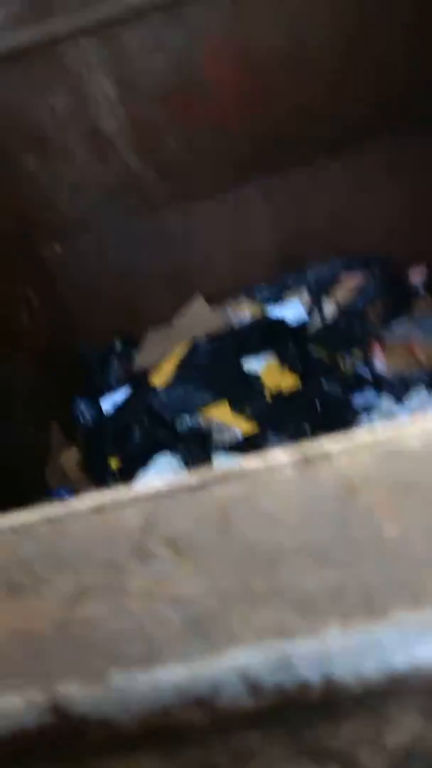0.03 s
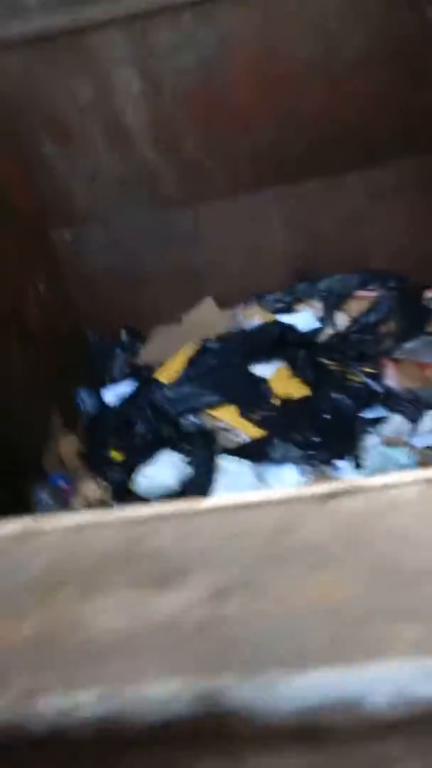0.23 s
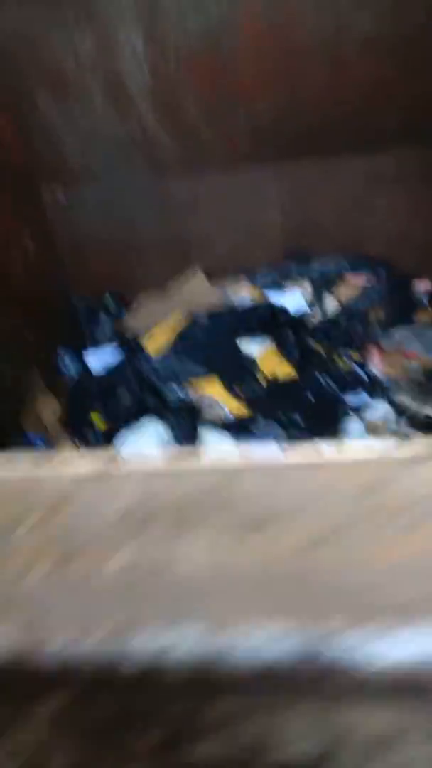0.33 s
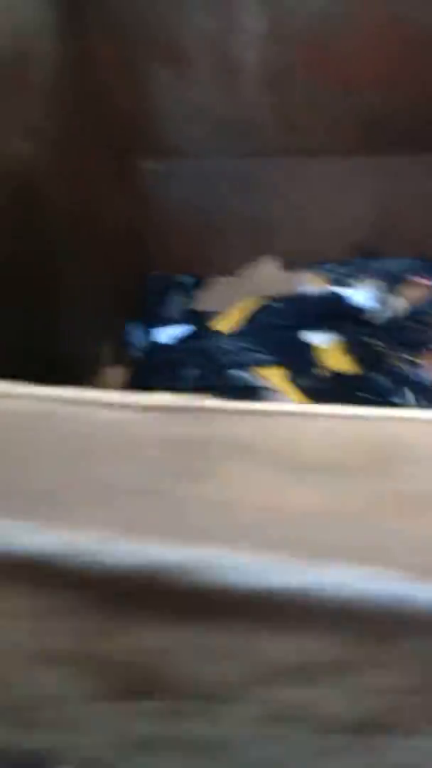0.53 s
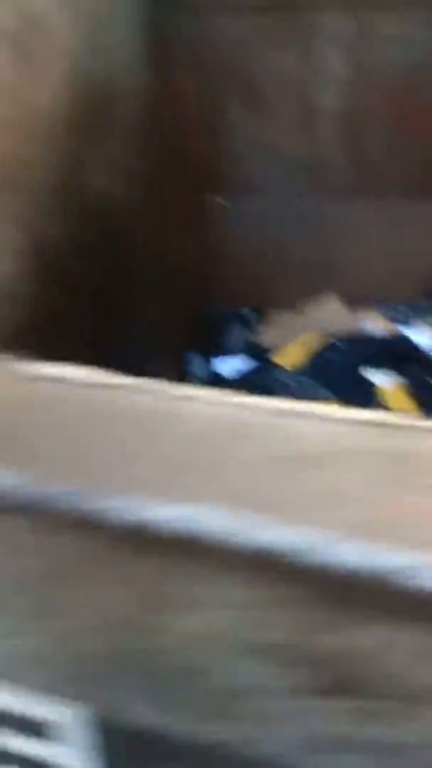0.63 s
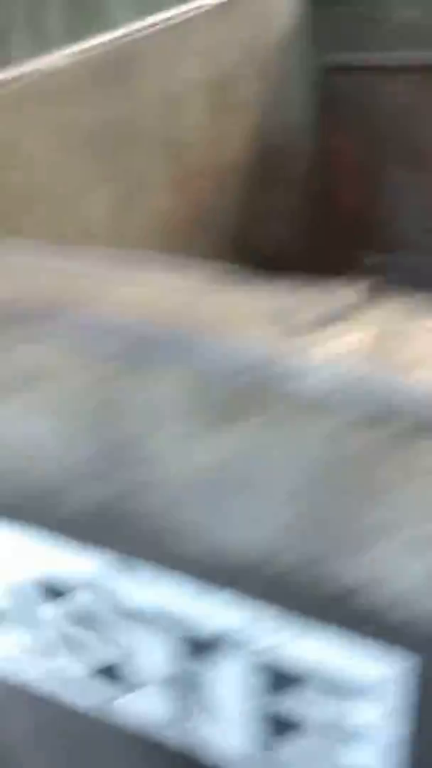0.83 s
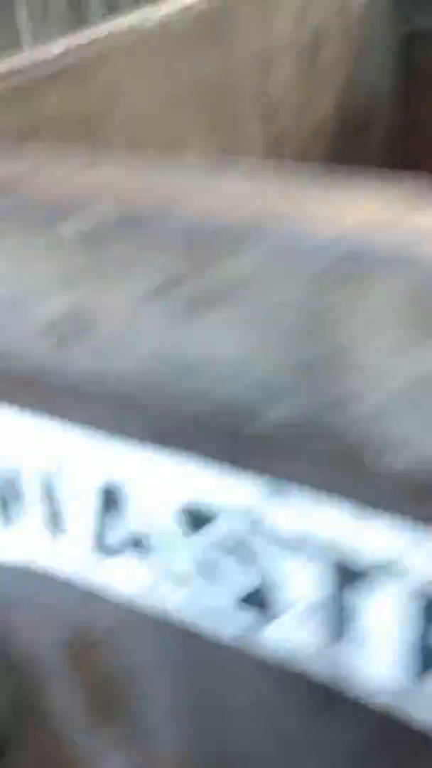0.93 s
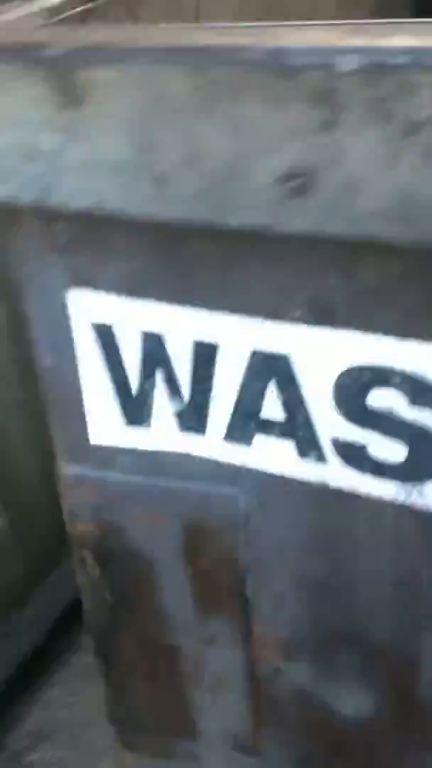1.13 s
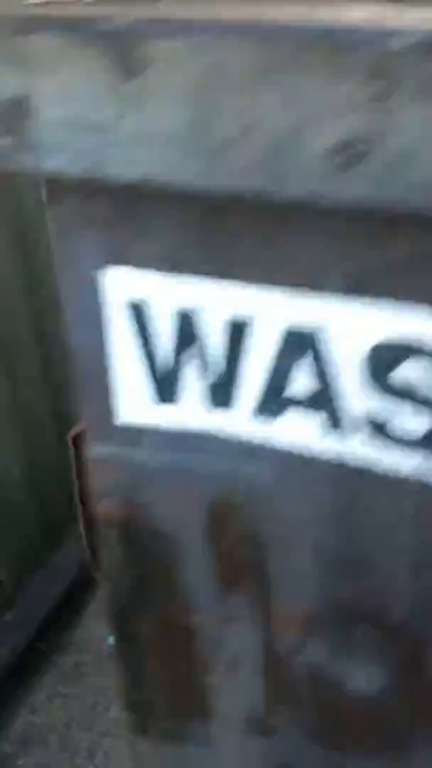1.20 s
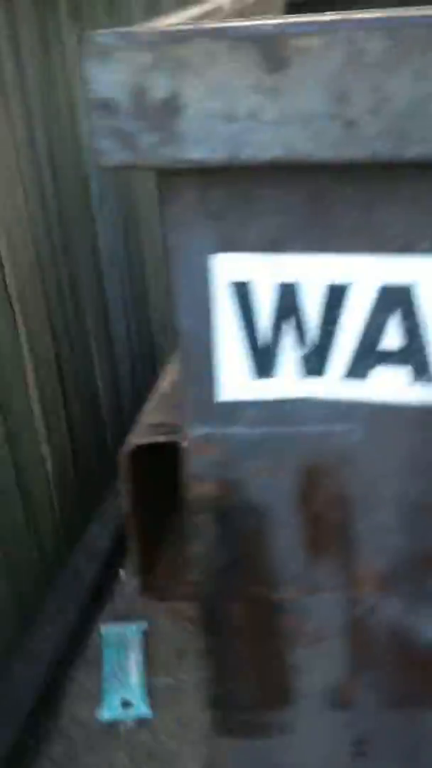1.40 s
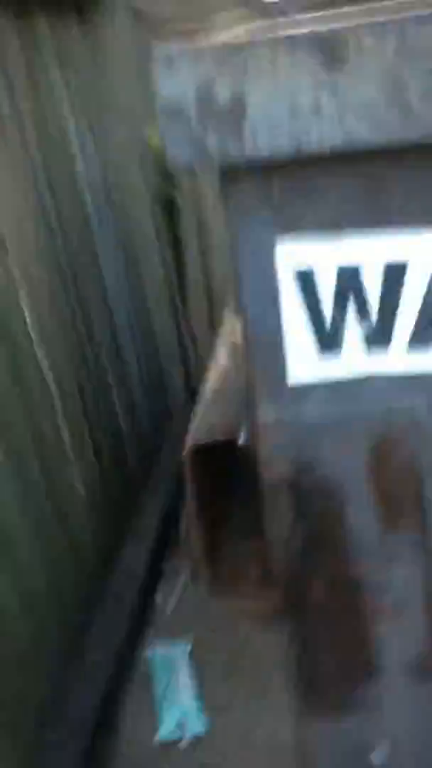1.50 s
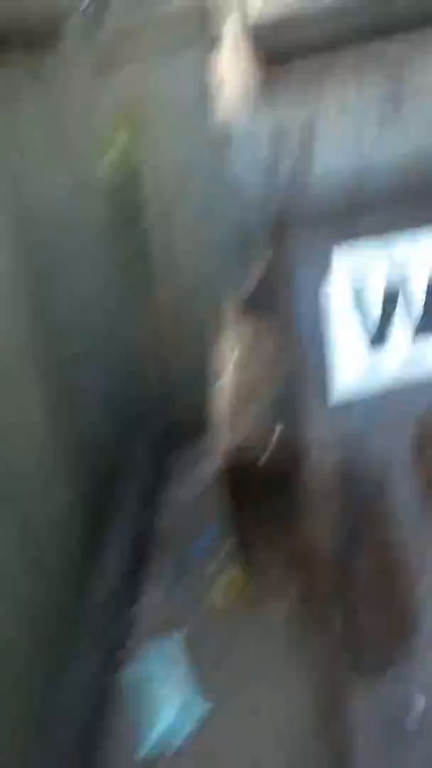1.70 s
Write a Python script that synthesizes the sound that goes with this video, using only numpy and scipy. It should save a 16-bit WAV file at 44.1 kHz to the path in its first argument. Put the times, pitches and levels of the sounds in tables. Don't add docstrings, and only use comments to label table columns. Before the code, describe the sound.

A heavy load thuds into a big steel waste bin, which booms and rings down outdoors

```python
import sys
import numpy as np
from scipy import signal
from scipy.fft import rfft, irfft, next_fast_len
from scipy.io import wavfile
from scipy.ndimage import uniform_filter1d, minimum_filter1d

SR = 44100
rng = np.random.default_rng(int(sys.argv[2]) if len(sys.argv) > 2 else 0)


def master(y):
    cut = np.clip(np.atleast_2d(y).T, -1, 1)
    pcm = np.round(cut * 32767)
    wavfile.write(sys.argv[1], SR, pcm.astype(np.int16))


def invert_db(x):
    u = np.asarray(x, float) / 20
    return 10 ** u


N = 77175
TIME = np.arange(N) / SR


def unit(x):
    return x / np.sqrt(np.mean(x ** 2) + 1e-20)


def along(points, hz):
    f, v = np.transpose(points)
    return np.interp(np.log(hz + 1), np.log(f + 1), v)


def filtered(x, response):
    m = next_fast_len(len(x) + 8192)
    return irfft(rfft(x, m) * response(np.fft.rfftfreq(m, 1 / SR)), m)[:len(x)]


def add(out, s, x):
    i = max(round(s * SR), 0)
    out[i:i + len(x)] += x[:len(out) - i]


def ring(t, hz, db, t60, phase):
    hz, db, t60 = (np.asarray(v)[:, None] for v in (hz, db, t60))
    rise_cycles = 0.37
    size = invert_db(db - 60 * t / t60) * (1 - np.exp(-t * hz / rise_cycles))
    return np.sum(size * np.sin(2 * np.pi * (hz * t + phase)), axis=0)


# start in seconds, strength in dB, brightness in dB per octave
# above 300 Hz, share reaching the low panels in dB per octave below it.
LOAD_BLOWS = [
    (0.2119, -6, -3.5, 1.5),
    (0.2164, -1, -0.5, -8),
    (0.2783, -4, 0, -4.5),
    (.372, -4.5, -6.5, -2),
]
# pitch in Hz, level in dB, decay to -60 dB in seconds.
WALL_PANELS = [(45.6, -25.5, 2.1), (58.92, -12, 1.45), (102.05, -18, 1.8), (122.5, -9, 0.84),
               (138.57, -15, 1.8), (175.3, -12, 1.48), (214.2, -7.5, 0.84), (246, -10, 1.012),
               (312.6, -20, 0.97), (342.6, -14.5, 0.77), (418.3, -13.5, 0.79), (456.6, -13.5, .5),
               (698.5, -23.5, 0.41), (1047, -26.5, 0.14)]
# frequency in Hz, level in dB.
PLATE_LEVEL = [(30, -26), (110, -18), (300, -12.5), (540, -19.5), (700, -20.5), (1200, -29.5),
               (2500, -41.5), (4600, -62)]
# frequency in Hz, decay to -60 dB in seconds.
PLATE_DECAY = [(40, 1.06), (180, 0.8), (450, 0.61), (800, 0.35), (2000, 0.22), (4600, 0.26)]


def steel(count=230):
    out, cracks = np.zeros(N), np.zeros(N)
    step = 4

    hz, db, t60 = np.transpose(WALL_PANELS)
    pair_hz, pair_db = 3.5, -4.5
    twin = hz + pair_hz * rng.choice([-1, 1], len(hz)) * np.sqrt(hz / 100)
    hz, t60, db = np.r_[hz, twin], np.r_[t60, t60], np.r_[db, db + pair_db]

    dense_hz = 30 + 4500 * ((np.arange(count) + rng.random(count)) / count) ** 2
    dense_t60 = along(PLATE_DECAY, dense_hz) * np.exp(0.22 * rng.standard_normal(count))
    for s, strength_db, bright_db, low_db in LOAD_BLOWS:
        def colour(f):
            slope = np.where(f > 300, bright_db, -low_db)
            return strength_db + slope * np.log2(np.maximum(f, 150) / 300)

        t = np.arange(0, N / SR - s + .01, step / SR)
        panel_db = db + colour(hz) + 2.44 * rng.standard_normal(len(hz))
        sound = ring(t, hz, panel_db, t60, flutter(t, 0.08, len(hz)))

        t = t[:SR // 6]
        dense_db = along(PLATE_LEVEL, dense_hz) - 6 + colour(dense_hz) + 1.4 * rng.standard_normal(count)
        field = ring(t, dense_hz, dense_db, dense_t60, flutter(t, 0.3, count))
        add(sound, 0, field * np.clip((t[-1] - t) * 4, 0, 1))

        add(out, s, signal.resample_poly(sound, step, 1))
        add(cracks, s, crack(strength_db, bright_db))
    return filtered(out, lambda f: 1 / (1 + (f / 6000) ** 12)) + cracks


def flutter(t, turns, count):
    knots = turns * rng.standard_normal((count, 60))
    u = t * 28
    k = u.astype(int)
    ease = np.sin(np.pi / 2 * (u - k)) ** 2
    return rng.random((count, 1)) + knots[:, k] + (knots[:, k + 1] - knots[:, k]) * ease


# frequency in Hz, level in dB.
CRACK_COLOUR = [(300, -43.5), (800, 20), (2300, 0), (3800, -25.5), (5200, -31), (8000, -47), (15000, -59)]


def crack(strength_db, bright_db):
    t = TIME[:SR // 10]
    rise_s, t60_s, level_db = 0.0015, 0.023, -1

    def colour(f):
        return invert_db(along(CRACK_COLOUR, f) + bright_db * np.log2((f + 1) / 800))

    burst = filtered(rng.standard_normal(len(t)), colour)
    shape = (1 - np.exp(-(t / rise_s) ** 2)) * invert_db(-60 * t / t60_s)
    return invert_db(strength_db + level_db + 3 * min(bright_db, 0)) * shape * unit(burst)


# start in seconds, rise in seconds, decay to -60 dB in seconds,
# level in dB, centre in Hz.
BAG_RUSTLES = [(.02, 0.027, 0.33, -63.5, 2500), (0.074, 0.029, 0.45, -55, 2700), (.07, 0.1, 0.76, -38, 279),
               (.075, 0.067, .4, -62, 7480), (0.089, 0.055, 0.55, -61, 4550),
               (0.089, .07, 0.56, -64.5, 1080), (.192, 0.029, .05, -36, 2300),
               (.405, 0.019, .16, -39, 2448), (.41, 0.022, 0.36, -53, 5500), (.53, 0.034, 1, -66.5, 3000),
               (.69, 0.019, 0.15, -43, 1545), (.69, 0.024, 0.45, -63.5, 6920), (.72, 0.03, 0.38, -62, 3300),
               (.7, 0.042, 0.23, -44, 602), (.855, .018, 0.18, -60, 2400), (0.879, .03, 0.37, -71.5, 4500),
               (1.01, 0.033, 0.6, -69, 2900), (1.095, 0.026, 0.13, -64.5, 3500),
               (1.338, 0.0037, 0.24, -62, 3216), (0.208, .01, 0.19, -53.5, 5600),
               (0.27, 0.016, 0.58, -59.5, 5080), (.1, 0.053, 0.23, -45.5, 587)]


def rustles():
    return crinkles(BAG_RUSTLES)


# start in seconds, rise in seconds, decay to -60 dB in seconds,
# level in dB, centre in Hz.
SHOE_SCUFFS = [
    (1.55, 0.0076, .1, -59, 1686),
    (1.58, 0.035, 0.22, -49.5, 1943),
    (1.591, 0.027, 0.17, -53, 4344),
    (1.601, 0.041, 0.27, -65.5, 8130),
    (1.635, 0.014, 0.082, -46.5, 1680),
    (1.649, 0.0028, 0.045, -45, 3800),
    (1.7, 0.024, 0.27, -68, 2770),
]


def scuffs():
    return crinkles(SHOE_SCUFFS)


def crinkles(events, count=700, size=640):
    out, t = np.zeros(N), TIME[:SR // 2]
    short = TIME[:size]
    for s, rise, t60, level_db, centre_hz in events:
        wide = 1 + np.abs(np.log2(centre_hz / 3200))
        place, luck = rng.random((count, 1)), rng.random((count, 1))
        hz = np.clip(centre_hz * np.exp(0.14 * wide * rng.standard_normal((count, 1))), 100, 15000)

        u = short / np.minimum(30 / hz, size / SR)
        grain = np.sin(np.pi * np.minimum(u, 1)) ** 2 * np.sin(2 * np.pi * hz * short)
        grain = grain * invert_db(-2.2 * np.log(luck + .02))
        where = (place * len(t)).astype(int) + np.arange(size)
        crinkle = np.bincount(where.ravel(), grain.ravel())[size // 2:][:len(t)]

        def colour(f):
            return np.exp(-(np.log((f + 1) / centre_hz) / 0.28 / wide) ** 2)

        hiss = filtered(rng.standard_normal(len(t)), colour)
        shape = np.where(t < rise, np.sin(np.pi / 2 * t / rise) ** 2, invert_db(-60 * (t - rise) / t60))
        add(out, s, invert_db(level_db) * shape * (unit(crinkle) + 0.61 * unit(hiss)))
    return out


# start in
# seconds, level in dB, pitch in Hz, decay to -60 dB in seconds.
HARD_KNOCKS = [(.2168, 1.5, 797, 0.037), (.217, -16.5, 1876, 0.028), (.2135, -5.5, 397.4, 0.28),
               (.2795, -1.5, 637, 0.11), (.28, -5, 740, 0.045), (.279, -7.5, 1040, 0.066),
               (.279, -32, 5100, 0.015), (.829, -47.5, 2430, 0.053), (.829, -51, 5250, 0.03),
               (1.079, -51.5, 3260, 0.039), (1.079, -47, 2047, 0.042), (1.095, -27, 140, .08),
               (1.498, -34, 408, 0.096), (1.512, -29.5, 518, 0.099), (1.554, -26, 717, 0.012),
               (1.59, -32.5, 750, 0.22), (1.605, -23.5, 891, 0.1), (1.606, -33.5, 292, 0.13),
               (1.6145, -18.5, 850, 0.074), (1.615, -19.5, 605, 0.08), (1.606, -39, 2150, 0.036),
               (1.61, -38.5, 1353, 0.15), (1.625, -22.5, 802, 0.043), (1.642, -20, 554, .05),
               (1.652, -23.5, 497, 0.075), (1.653, -29, 176, 0.058), (1.653, -34, 3330, .02),
               (1.653, -47.5, 5100, 0.04)]


def ticks():
    out, t = np.zeros(N), TIME[:SR // 4]
    spread = np.array([0 - 0.5, -1, 2.5, -3.5, 5.0])
    for s, level_db, pitch_hz, t60 in HARD_KNOCKS:
        hz = pitch_hz * np.exp(.07 * (spread + 0.44 * rng.standard_normal(5)))
        add(out, s, ring(t, hz, level_db - 5 * np.abs(spread) - 2, [t60] * 5, 0))
    return out


def yard(x):
    t, t60_s, level_db = TIME[:SR // 3], 0.19, -18
    tail = filtered(rng.standard_normal(len(t)), lambda f: 1 / (1 + f / 5000)) * invert_db(-60 * t / t60_s)
    late = np.pad(x, (220, 0))
    return invert_db(level_db) * signal.fftconvolve(late, tail / np.linalg.norm(tail))[:N]


# frequency in Hz, level in dB per Hz.
HUM_COLOUR = [(20, -1.5), (120, -2.5), (300, -6.5), (900, -16.5), (2200, -35), (3200, -47.5), (11000, -55),
              (16000, -83.5)]


def hum():
    z = signal.stft(rng.standard_normal(N), nperseg=512)[2]
    patches = uniform_filter1d(rng.standard_normal(z.shape), 5, 0)
    patches = uniform_filter1d(patches, 10, 1)
    x = signal.istft(z * invert_db(1.5 * unit(patches)), nperseg=512)[1][:N]
    level_db = -43
    return invert_db(level_db) * unit(filtered(x, lambda f: invert_db(along(HUM_COLOUR, f))))


def scene():
    drive_db = 2
    near = invert_db(drive_db) * steel() + rustles() + scuffs() + ticks()
    return (near + yard(near) + hum())[None]


def band_limit(x):
    return signal.sosfilt(signal.butter(12, 15720, fs=SR, output="sos"), x)


def record(dry):
    ceiling_db, hold_s, smooth_s, release_db_per_s = -1.3, .008, .004, 70.5
    need_db = np.minimum(ceiling_db - 20 * np.log10(np.abs(dry[0]) + 1e-9), 0)
    need_db = minimum_filter1d(need_db, size=max(int(hold_s * SR), 3))
    ramp = release_db_per_s * TIME
    gain_db = np.minimum.accumulate(need_db - ramp) + ramp
    gain_db = uniform_filter1d(np.minimum(gain_db, 0), size=max(int(smooth_s * SR), 3))
    return band_limit(dry * invert_db(gain_db))


dry = scene()
out = record(dry)
master(out)
```